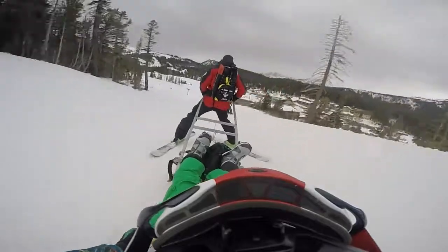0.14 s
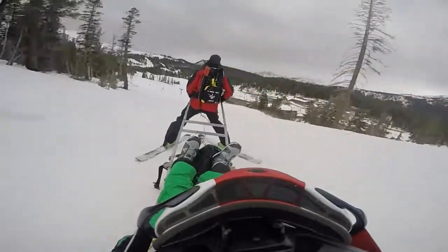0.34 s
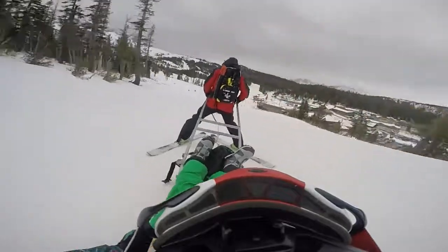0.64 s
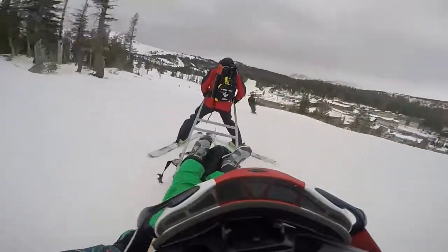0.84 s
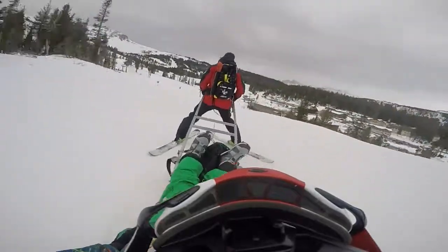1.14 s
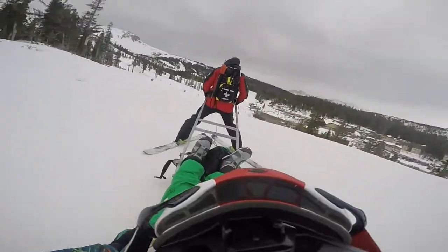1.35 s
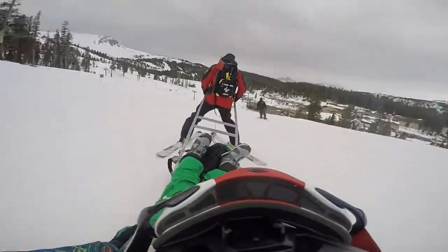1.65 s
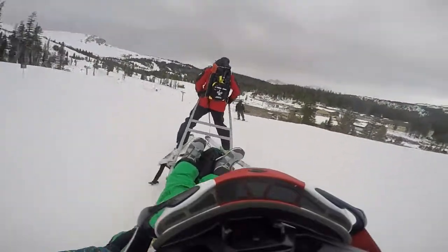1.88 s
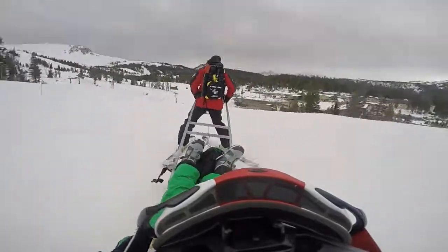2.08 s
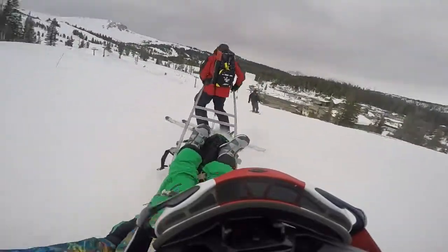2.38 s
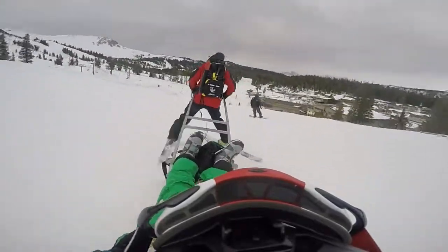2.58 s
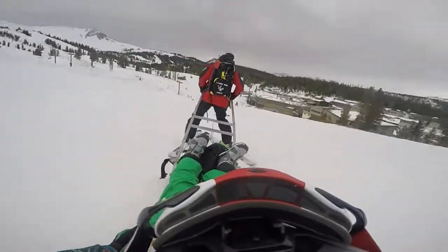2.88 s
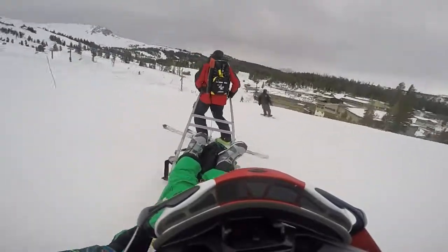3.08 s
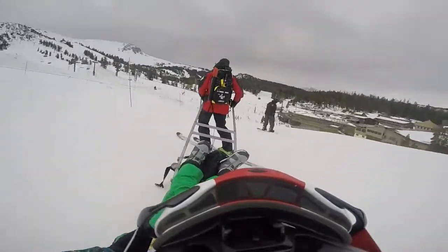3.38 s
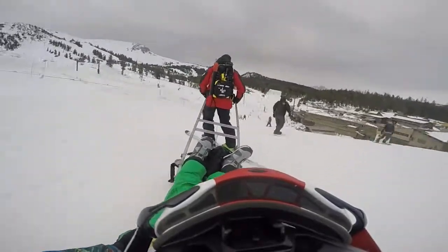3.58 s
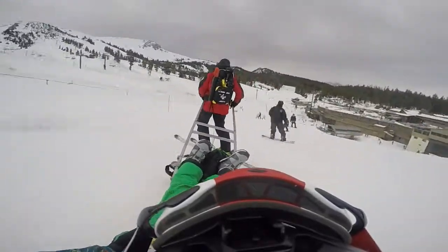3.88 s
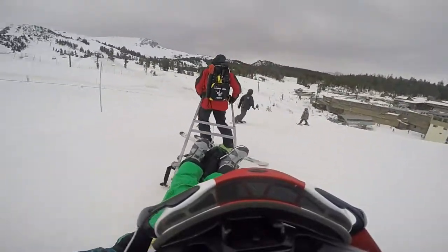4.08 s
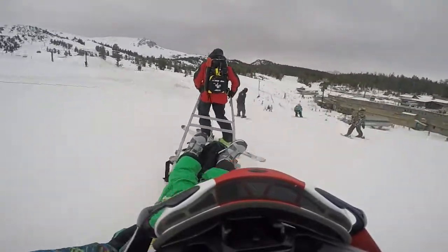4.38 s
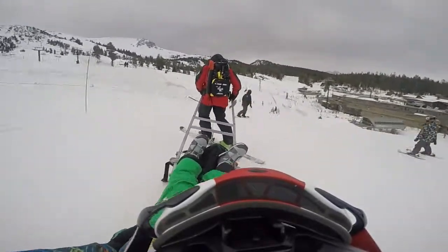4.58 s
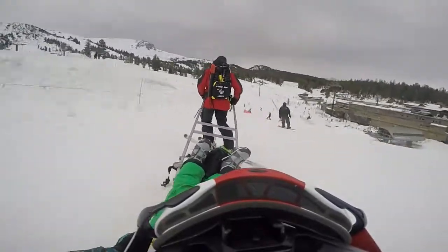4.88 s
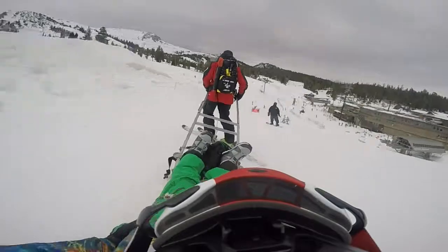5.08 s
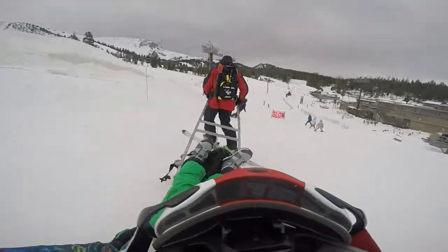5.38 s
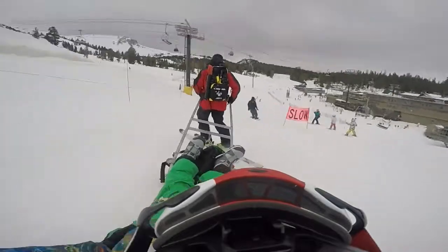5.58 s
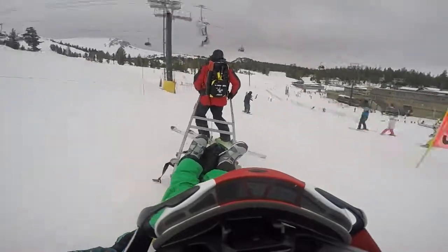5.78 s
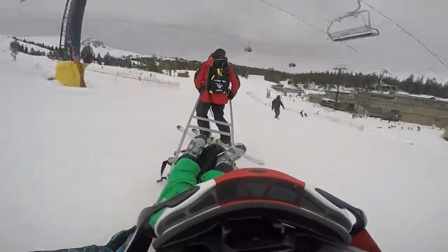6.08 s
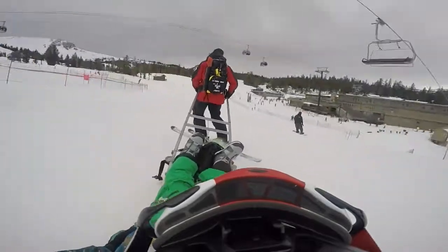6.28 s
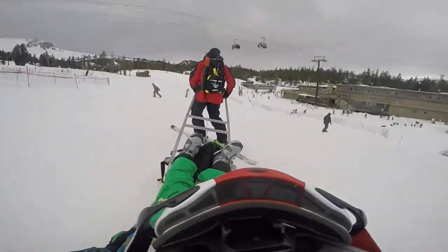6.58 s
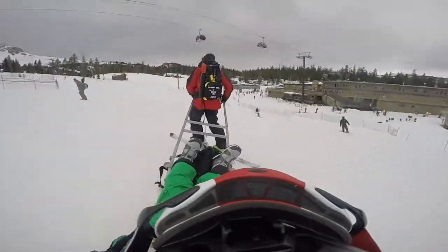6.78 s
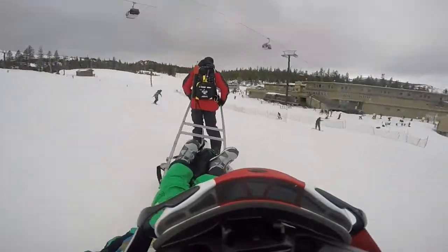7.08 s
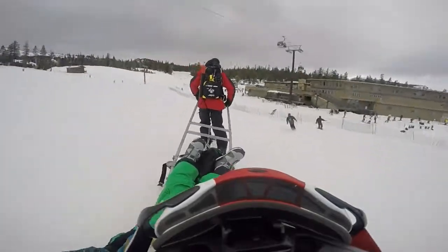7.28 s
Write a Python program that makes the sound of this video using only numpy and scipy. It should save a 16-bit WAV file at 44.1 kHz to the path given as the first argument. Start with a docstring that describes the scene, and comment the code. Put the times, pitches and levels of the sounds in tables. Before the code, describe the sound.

Wind buffets a small camera worn by the passenger of a sled towed down a ski slope, making a hollow boom over a deep rumble. Gusts open into a roar, and snow spray sizzles in bright spurts. Underneath, the sled hisses and the skis scrape faintly, with a few low knocks and tiny ticks. The wind eases around two seconds, roars hardest after five, dips, then builds again.

```python
"""Wind buffets a small plastic camera housing worn by the passenger of a rescue sled towed down a ski slope.
The wind makes the housing boom, and strong gusts tear into a roar. Air and snow spray add a fine,
bright sizzle that comes in spurts, with puffs of powder and ticks of ice grains hitting the housing.
Bumps jolt the housing, gear clicks lightly, and the skis and hull scrape and hiss over the snow."""
import sys
import numpy as np
from scipy import signal
from scipy.fft import rfft, irfft, next_fast_len
from scipy.io import wavfile
from scipy.ndimage import uniform_filter1d

SR = 44100
rng = np.random.default_rng(int(sys.argv[2]) if len(sys.argv) > 2 else 0)


def to_wav(sig):
    """Store sig (one row per channel, or 1-D mono) as 16-bit WAV at the path in sys.argv[1].

    Samples outside -1..1 are clipped; the rate is SR.
    """
    pcm = np.clip(np.atleast_2d(sig), -1, 1) * 32767
    pcm = np.round(pcm).astype(np.int16)
    wavfile.write(sys.argv[1], SR, pcm.T)  # frames by channels


N = 328545
TIME = np.arange(N) / SR
GUST_FADE = dict(attack_s=0.016, release_s=0.012)

# gusts, some carrying powder: t/s, length/s, extra wind/dB, extra sizzle/dB
GUSTS = [(0.261, 0.071, 3, 4), (0.7, 0.15, 3.3, 5.5), (0.862, 0.045, 6, 6), (1.12, 0.084, 3.5, 5.7),
         (1.25, 0.031, 7.5, 4.2), (1.393, 0.09, 3.5, 6.7), (1.511, 0.097, 3.5, 3.5), (2.323, 0.108, 4, 7.5),
         (2.492, 0.073, 5.5, 7.0), (2.94, 0.091, 2.5, 6), (3.145, 0.062, 5.5, -1), (3.26, 0.136, 2, 2.2),
         (4.118, 0.064, 4, 4.3), (4.621, 0.057, 3.5, 4.5), (5.361, 0.136, 3, 6), (5.734, 0.15, 0.3, 2.5),
         (6.119, 0.093, 2.5, 3.5), (6.973, 0.1, 3.5, 2), (7.168, 0.1, 4.5, 4.5)]
def wind(flow_db, eddies):
    """Rushing air booms, roars and buffets; gusts lift the boom and the roar."""
    gust_db = bursts([(s, length, db) for s, length, db, _ in GUSTS], **GUST_FADE)
    return boom(flow_db, gust_db, eddies) + roar(flow_db, gust_db, eddies) + buffeting(eddies)


# tone of the booming housing: f/Hz, level/dB
BOOM_TONE = [(110, -37), (155, -11), (212, -6), (248, -2), (275, 2), (298, -2.5), (335, -5), (372, -7),
             (420, -14), (500, -25.5), (700, -37), (1500, -51.5)]
def boom(flow_db, gust_db, eddies):
    """Swirling air makes the hollow housing boom, louder as the air speeds up."""
    level_db = -21.5 + flow_db + 0.91 * gust_db + 1.56 * drift(30)
    return from_db(level_db) * steady(turbulence(BOOM_TONE, eddies, lumpy_db=1.5), span_s=0.09)


# tone of the roaring wind: f/Hz, level/dB
ROAR_TONE = [(200, -36), (420, 0.5), (580, 2), (720, -1), (890, -4.5), (955, 0), (1020, -8.5), (1170, -4.5),
             (1500, -15), (2300, -20.5), (5000, -45)]
def roar(flow_db, gust_db, eddies):
    """The roar grows faster with the airflow than the boom, so it tears open in strong wind."""
    level_db = -39 + 1.58 * flow_db + 0.71 * gust_db + 1.3 * drift(14)
    return from_db(level_db) * steady(turbulence(ROAR_TONE, eddies, lumpy_db=2.5), span_s=0.072)


# tone of the deep rumble: f/Hz, level/dB
BUFFET_TONE = [(20, -38), (32, -18), (45, -7.5), (62, 2.5), (85, 3), (125, 1), (180, -5.5), (260, -34),
               (500, -45)]
# loudness of the deep rumble: t/s, level/dB
BUFFET_LEVELS = [(0.0, -26), (0.6, -26), (0.8, -25), (1.2, -25), (1.56, -26.5), (1.66, -19.5),
                 (1.79, -25.5), (2.08, -29), (2.25, -25.5), (3.3, -25), (4.2, -26), (4.68, -29.5),
                 (4.98, -24), (5.8, -25.5), (5.95, -32), (6.1, -26), (7.02, -28), (7.45, -21.5)]
def buffeting(eddies):
    """Swirls of air push on the microphone and make a deep rumble."""
    rumble = steady(turbulence(BUFFET_TONE, eddies, lumpy_db=2.0), span_s=0.17)
    return from_db(in_time(BUFFET_LEVELS)) * rumble


# airflow over the housing, where 0 dB is cruising: t/s, level/dB
AIRFLOW = [(0.0, -1.5), (0.65, -1.45), (1.38, -1.3), (1.58, 0.7), (1.66, -0.9), (2.02, -5), (2.67, -2.5),
           (3.49, -0.5), (3.88, -4), (4.44, -3), (4.73, -0.7), (5.17, -2), (5.49, 4.5), (5.55, 4.5),
           (5.94, 4), (6.43, -2.5), (6.96, 0.5), (7.45, 3.5)]
# brief lulls in the airflow: t/s, length/s, drop/dB
LULLS = [(0.611, 0.041, 2.8), (2.435, 0.036, 3), (5.582, 0.056, 4.3), (7.376, 0.024, 6)]
def airflow():
    """Strength in dB of the wavering stream of air that drives boom, roar and spray."""
    return in_time(AIRFLOW) - bursts(LULLS, **GUST_FADE) + 0.62 * drift(6.6)


# tone of the snow spray: f/Hz, level/dB
SIZZLE_TONE = [(1200, -44), (2600, -23.5), (3350, -14), (3900, -21), (5000, -20), (5400, -11.5),
               (5850, -14), (6600, -11.5), (7700, -13.5), (9400, -5), (11000, 2), (12200, -4.5),
               (13800, -8), (15600, -9.5)]
# powder thrown up by the skis: t/s, length/s, extra sizzle/dB
SPURTS = [(0.27, 0.017, 6), (0.365, 0.035, 7), (0.415, 0.19, 4.5), (1.327, 0.027, 5.5), (1.713, 0.033, 6),
          (1.856, 0.022, 7), (2.699, 0.031, 3.9), (2.848, 0.012, 7.7), (4.482, 0.047, 5),
          (4.709, 0.055, 4.5), (4.913, 0.015, 7), (5.42, 0.12, 1.5), (5.91, 0.1, 2.7), (6.3, 0.048, 5),
          (7.103, 0.033, 7)]
def spray(flow_db, eddies):
    """Air and powder stream over the housing and sizzle in quick spurts."""
    gust_db = bursts([(s, length, db) for s, length, _, db in GUSTS], **GUST_FADE)
    spurt_db = bursts(SPURTS, attack_s=0.01, release_s=0.032)
    level_db = -36 + 1.7 * flow_db + gust_db + spurt_db
    sputter = np.tanh(0.9 * (0.5 * eddies + 0.4 * drift(67)))
    stream = rng.standard_normal(N) + from_db(-4) * grains(per_s=1500, spread_db=3.0)
    flutter = from_db(4.5 * sputter + 2.2 * drift(260))
    sizzle = steady(coloured(stream * flutter, SIZZLE_TONE), span_s=0.15)
    # the sizzle thins for an instant before each puff or tick
    thinning = sum(np.exp(-((TIME - s + 0.005) / 0.007) ** 2) for s, *_ in [*PUFFS, *TICKS])
    thinning_db = -4 * np.minimum(thinning, 1)
    return from_db(level_db + thinning_db) * sizzle


# sudden puffs of spray: t/s, relative level/dB, swell time/s
PUFFS = [(1.2618, -16.5, 0.002), (2.295, -20, 0.0016), (2.5004, -19, 0.0013), (2.5437, -18, 0.0022),
         (5.4311, -15, 0.0022), (5.751, -11, 0.002), (6.399, -18, 0.0024), (6.7545, -15, 0.002),
         (6.8633, -23, 0.0018), (6.98, -13, 0.0014), (7.016, -11, 0.0019), (7.058, -14, 0.002),
         (7.1653, -13, 0.0012)]
def puffs():
    """Clumps of powder burst against the housing in a few milliseconds and are gone."""
    level = sum(from_db(db) * swell(s, swell_s) for s, db, swell_s in PUFFS)
    return from_db(-9.5) * level * coloured(rng.standard_normal(N), SIZZLE_TONE)


# ice grains hitting the housing: t/s, relative level/dB
TICKS = [(0.2742, -10), (1.1342, -13), (2.3888, -13), (5.4831, 0), (6.5603, -15), (7.1678, -7)]
# tone of a cracking grain: f/Hz, level/dB
CRACK_TONE = [(500, -2), (2800, -11), (5000, -14.5), (7700, -22), (11000, 10), (15500, -5)]
def ice_ticks():
    """Grains of ice shatter on the housing, each with a tiny burst of bright noise."""
    level = sum(from_db(db) * swell(s, peak_s=0.0004) for s, db in TICKS)
    crack = steady(coloured(rng.standard_normal(N), CRACK_TONE), span_s=0.001)
    return from_db(-6) * level * crack


# bumps in the snow: t/s, relative level/dB
BUMPS = [(0.272, -13), (1.415, -1.5), (1.591, 0.5), (2.403, -10), (5.382, -13), (5.76, -5), (6.852, -9),
         (6.94, -7), (7.015, -3), (7.165, -10), (7.264, 3.5), (7.348, -14)]
# notes the housing rings at: f/Hz, level/dB, time to fade by 60 dB/s
HOUSING_NOTES = [(251, -11, 0.12), (362, -12, 0.04)]
def jolts():
    """Each bump jolts the housing, which rings with a low knock."""
    return strikes(BUMPS, HOUSING_NOTES)


# strokes of the ski edges in the turns: t/s, length/s, relative level/dB
SKI_STROKES = [(0.26, 0.22, -48.5), (0.732, 0.21, -49.5), (1.52, 0.14, -51), (1.8, 0.15, -48),
               (2.34, 0.18, -48.5), (2.783, 0.17, -53), (3.033, 0.19, -43.5), (3.28, 0.15, -45.5),
               (4.08, 0.22, -43.5), (4.45, 0.4, -42), (4.582, 0.15, -43), (5.0, 0.12, -45),
               (5.347, 0.16, -39), (5.695, 0.21, -43), (5.98, 0.15, -43), (6.605, 0.29, -46.5)]
# tone of the scraping edges: f/Hz, level/dB
EDGE_TONE = [(400, 1), (700, -12), (950, 0.5), (1200, 4), (1500, 2.5), (1950, 2), (2600, -6.5),
             (3250, -9.5), (3800, -19), (6500, -13), (15000, -17.5)]
def ski_scrape():
    """The skis ahead glide quietly, then scrape and judder as their edges press into each turn."""
    glide_power = from_db(-46) ** 2
    strokes = [(s, length, from_db(db) ** 2) for s, length, db in SKI_STROKES]
    load = np.sqrt(glide_power + bursts(strokes, attack_s=0.1, release_s=0.13))
    crunch = rng.standard_normal(N) + from_db(-4.5) * grains(per_s=400, spread_db=4.5)
    judder = from_db(2.5 + 1.6 * drift(32))
    bite = 1 / (1 + (from_db(-53.5) / load) ** 2)   # a lightly pressed edge cuts less
    return bite * load * judder * coloured(crunch, EDGE_TONE)


# tone of the sliding hull: f/Hz, level/dB
HULL_TONE = [(400, 3), (1500, -0.5), (3000, -1.5), (3800, -8), (5100, -6.5), (5600, -3.5), (6500, 4),
             (7100, 2), (7650, -7.5), (9000, 3), (12000, -15), (15500, -2)]
def hull_hiss():
    """The underside of the sled hisses steadily over crushed snow."""
    return from_db(-43 + drift(36)) * coloured(rng.standard_normal(N), HULL_TONE)


# light taps of gear on the sled: t/s, relative level/dB
GEAR_TAPS = [(0.3162, -25.5), (0.7697, -24.5), (2.6487, -24.5), (5.472, -26), (5.4833, -20.5),
             (5.7154, -27)]
# notes the gear rings at: f/Hz, level/dB, time to fade by 60 dB/s
GEAR_NOTES = [(2300, -8, 0.0098), (3180, -5, 0.0056), (4500, -20, 0.0033), (6360, 0, 0.006),
              (8100, -3, .005)]
def gear_clicks():
    """Tapped gear rings so briefly that it sounds like a click."""
    return strikes(GEAR_TAPS, GEAR_NOTES)


def from_db(db):
    """Turn decibels into a number to multiply a sound by."""
    return 10 ** (np.asarray(db) / 20)


def rms_one(x):
    """Scale a signal so its average strength (rms) is 1."""
    return x / np.sqrt(np.mean(x ** 2) + 1e-20)


def in_time(rows):
    """Join (time, value) points with straight lines."""
    return np.interp(TIME, *np.transpose(rows))


def coloured(x, tone):
    """Give plain noise the lows and highs of a tone table, at strength 1."""
    size = next_fast_len(N)
    hz, db = np.transpose(tone)
    bin_hz = np.maximum(np.arange(size // 2 + 1) * SR / size, 1)
    gain = from_db(np.interp(np.log(bin_hz), np.log(hz), db))
    return rms_one(irfft(rfft(x, size) * gain, size)[:N])


def drift(rate):
    """A smooth random wobble of strength 1; rate, in Hz, sets how fast it moves."""
    r = np.exp(-40 * np.pi * rate / SR)
    slow = signal.lfilter([1], [1, -2 * r, r * r], rng.standard_normal(N // 20 + 4002))[4000:]
    return np.interp(np.arange(N) / 20, np.arange(len(slow)), rms_one(slow))


def steady(x, span_s):
    """Hold the level at 1 over the span, leaving the faster flutter."""
    return x / np.sqrt(uniform_filter1d(x ** 2, max(int(span_s * SR), 2)) + 1e-12)


def turbulence(tone, eddies, lumpy_db):
    """Noise that swells with each passing swirl of air."""
    return coloured(rng.standard_normal(N) * from_db(lumpy_db * eddies), tone)


def grains(per_s, spread_db):
    """Random clicks, many small and a few large, at strength 1 overall."""
    sizes = from_db(spread_db * np.minimum(rng.exponential(1, N), 5))
    return rms_one(sizes * rng.choice([-1, 1], N) * (rng.random(N) < per_s / SR))


def bursts(rows, attack_s, release_s):
    """Add up shapes that rise, hold and fall; rows are t/s, length/s, height."""
    return sum(
        height * np.clip(np.minimum((TIME - s) / attack_s, (s + length - TIME) / release_s) + 0.5, 0, 1)
        for s, length, height in rows)


def swell(s, peak_s):
    """A shape that starts at time s, reaches 1 after peak_s and dies away."""
    age = np.clip((TIME - s) / peak_s, 0, 30)
    return age * np.exp(1 - age)


def ring(clicks, hz, fade_s):
    """Each click starts a pure note that fades by 60 dB in fade_s."""
    r, w = from_db(-60 / (fade_s * SR)), 2 * np.pi * hz / SR
    return signal.lfilter([0, np.sin(w)], [1, -2 * r * np.cos(w), r * r], clicks + 1e-18)


def strikes(blows, notes):
    """Each blow rings all of an object's notes, with slightly random strengths."""
    s, blow_db = np.transpose(blows)
    chance_db = rng.standard_normal((len(s), len(notes)))
    out = np.zeros(N)
    for k, (hz, db, fade_s) in enumerate(notes):
        clicks = np.zeros(N)
        clicks[(s * SR).astype(int)] = from_db(blow_db + db + chance_db[:, k])
        out += ring(clicks, hz, fade_s)
    return out


def scene():
    """Mix one channel; the same airflow, gusts and swirls stir both wind and spray."""
    eddies = drift(63)   # small, quick swirls of air
    flow_db = airflow()
    air = wind(flow_db, eddies) + spray(flow_db, eddies)
    sliding = ski_scrape() + hull_hiss()
    hits = puffs() + ice_ticks() + jolts() + gear_clicks()
    return (air + sliding + hits)[None, :]


def record(dry):
    """Clip peaks at full scale and cut the treble above 15800 Hz."""
    top_cut = signal.ellip(12, 0.1, 90, 15800, fs=SR, output="sos")
    return signal.sosfilt(top_cut, np.clip(dry, -1, 1))


dry = scene()
out = record(dry)
to_wav(out)
```